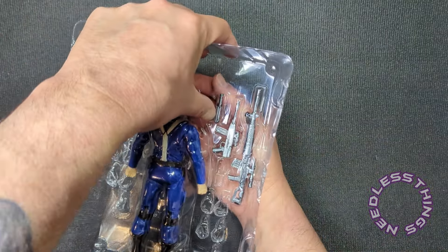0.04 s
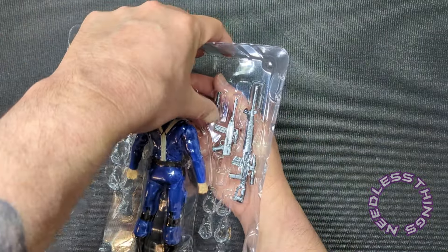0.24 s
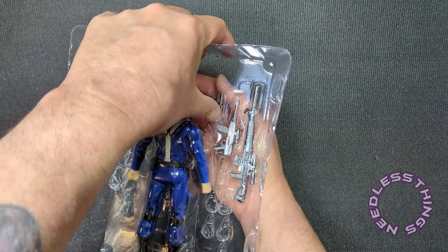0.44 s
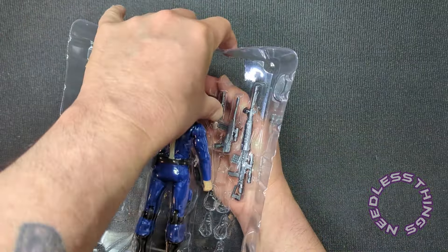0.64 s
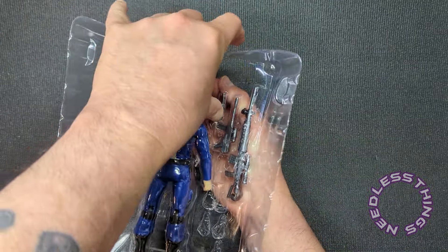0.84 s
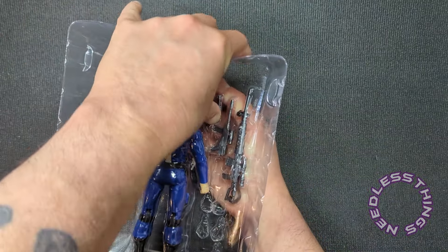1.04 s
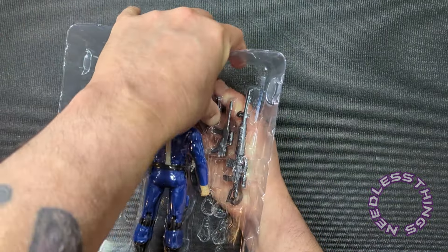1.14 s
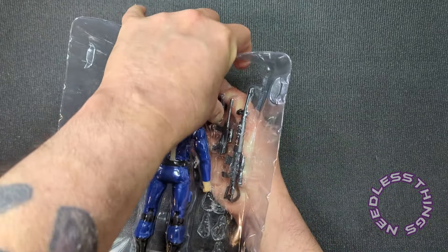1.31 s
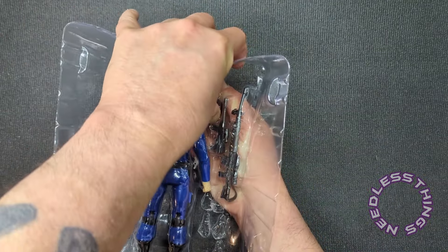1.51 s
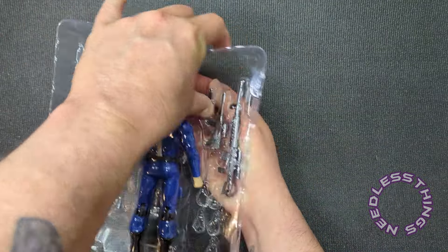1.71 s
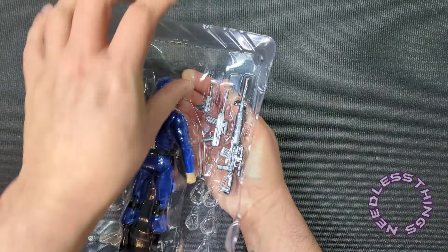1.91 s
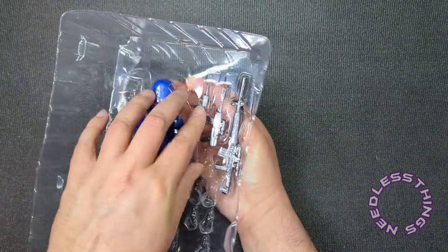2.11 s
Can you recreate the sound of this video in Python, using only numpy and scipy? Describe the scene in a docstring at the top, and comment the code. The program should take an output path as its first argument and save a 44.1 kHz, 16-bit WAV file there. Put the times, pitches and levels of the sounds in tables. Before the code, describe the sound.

A thin plastic tray crackles and snaps irregularly as hands bend it to press out a toy figure. Two louder hollow pops stand out, with soft bumps on a cloth-covered table, close to the microphone in a small room.

```python
"""Pressing an item out of a blister tray

Close to a stereo microphone in a small room, two hands bend a thin plastic tray to free a small item.
Creases snap and set the wall ringing, moulded pockets buckle with hollow pops, and fine crackle runs
between them. A finger judders over the sheet; the tray bumps softly on a cloth-covered table."""
import sys
import numpy as np
from scipy import signal
from scipy.fft import rfft, irfft
from scipy.io import wavfile

SR = 44100
rng = np.random.default_rng(int(sys.argv[2]) if len(sys.argv) > 2 else 0)


def dump_mix(stems):
    """Bounce the given channels to the path in sys.argv[1] as a 16-bit WAV at rate SR."""
    frames = np.atleast_2d(stems).T  # one column per channel
    limited = np.clip(frames, -1, 1)  # hard clip at full scale
    pcm = np.round(limited * 32767).astype(np.int16)
    wavfile.write(sys.argv[1], SR, pcm)


N = 94815
BURST = 8192  # samples in one snap or pop
CUTOFF_HZ = 15900
PAN_DB = np.array([[-1.15], [1.15]])  # cracks and fizz sit a little to the right

# Creases snapping: (time [s], crack level [dB], added tilt [dB/octave], facet pitch [Hz], wall level [dB])
CREASE_SNAPS = [(0.0405, -36, -7, 2140, -41), (0.069, -36.5, -5.5, 7530, -52),
                (0.101, -39, -5.5, 2230, -51), (0.177, -52, -7, 2000, -47.5),
                (0.221, -39.5, -3, 6900, -35.5), (0.2445, -25.5, -8.5, 5300, -33),
                (0.277, -37, 9, 14000, -44), (0.338, -41, 0, 2930, -44.5), (0.363, -35.5, 1.5, 13400, -44),
                (0.4158, -25.5, 3, 12900, -67), (0.458, -28.5, -11.5, 2780, -29.5),
                (0.507, -27.5, 9, 13700, -43), (0.5185, -29, -12, 1800, -26), (0.543, -19, -2, 5100, -27),
                (0.592, -31.5, -7, 2860, -65), (0.6095, -24, -5, 1300, -18), (0.669, -32, -1, 2200, -40),
                (0.6811, -22.5, -2.5, 6500, -41), (0.7086, -23.5, -2.5, 4570, -31.5),
                (0.745, -33, -2.5, 8000, -33), (0.781, -28.5, -2.5, 2280, -39),
                (0.89, -28, 1.5, 2780, -42.5), (0.9325, -30.5, 12, 12200, -38),
                (0.9566, -26.5, -6, 5900, -38), (1.021, -34.5, -4.5, 7500, -57),
                (1.051, -46, 8, 2700, -31.5), (1.0851, -22, -1.5, 9200, -46), (1.111, -37, -6, 2020, -29.5),
                (1.239, -23.5, -2, 8950, -30.5), (1.256, -26.5, 4, 13200, -42),
                (1.2752, -22.5, -2, 8800, -41), (1.292, -23.5, 1.5, 13900, -27),
                (1.2971, -18, 2, 14300, -32), (1.33, -27.5, -2.5, 7160, -28),
                (1.363, -23.5, -2, 6750, -26.5), (1.3825, -23, 0.8, 7050, -30.5),
                (1.397, -23.5, -10, 8900, -25), (1.404, -21, 2.5, 6400, -24.5),
                (1.408, -24.5, -10, 1050, -23), (1.415, -28.5, -0.5, 9000, -44),
                (1.4833, -14.5, -7, 6400, -61), (1.623, -33, -5, 2030, -53), (1.661, -27, -4.5, 14400, -32),
                (1.683, -31.5, 2, 6140, -26), (1.717, -31, -16, 4170, -17),
                (1.7505, -23.5, -4.5, 1560, -27), (1.7905, -42, -8, 2700, -25.5),
                (1.805, -24, -2.5, 12200, -16), (1.86, -31, -4.5, 2450, -46),
                (1.876, -25.5, -9.5, 2530, -24), (2.051, -46, -1.5, 8300, -51)]
# Modes of the tray wall: (frequency [Hz], level [dB], t60 [s])
WALL_MODES = [(649, -6.5, 0.04), (755.6, 3.5, 0.037), (903, -5, 0.03), (1060, -6.5, 0.035),
              (1297, -27, 0.064), (1483, -6.5, 0.028)]


def snaps():
    """Each crease cracks and knocks the tray wall, which the grip retunes from snap to snap."""
    out = np.zeros((2, N))
    for start, crack_db, tilt_db, facet_hz, wall_db in CREASE_SNAPS:
        crack = from_db(crack_db + 0.5 + PAN_DB) * crease_crack(tilt_db + 0.5, facet_hz)
        wall = from_db(wall_db) * ring(WALL_MODES, detune=0.028, build_up_cycles=1.6)
        add(out, start, crack + wall)
    return out


def crease_crack(tilt_db, facet_hz):
    """A hard tick and a short burst of noise, coloured by the facet that flips."""
    rise_s, decay_s, low_hz, facet_width_hz, likeness = 0.00037, 0.002, 1150, 1170, 0.32
    t = np.arange(BURST) / SR
    hz = np.geomspace(100, SR / 2, 400)
    ripple_db = 2.5 * np.interp(hz, np.linspace(0, SR / 2, 48), rng.standard_normal(48))
    slope_db = tilt_db * np.log2(np.clip(hz, low_hz, CUTOFF_HZ) / low_hz)
    edge_loss_db = 10 * np.log10(1 + (low_hz / hz) ** 4) + 20 * (hz > CUTOFF_HZ)
    facet_db = 8.5 / (1 + (2 * (hz - facet_hz) / facet_width_hz) ** 2)
    colour_db = slope_db + ripple_db + facet_db - edge_loss_db
    shimmer = from_db(-9) * np.exp(-t / 0.011)  # bending waves run on through the sheet
    envelope = (1 - np.exp(-t / rise_s)) * (np.exp(-t / decay_s) + shimmer)
    mid, side = envelope * rng.standard_normal((2, BURST))
    mid[int(2 * rise_s * SR)] += from_db(18) / 2  # the tick
    return unit_strike(coloured(left_right(mid, side, likeness), np.c_[hz, colour_db]))


# Pockets buckling or springing back: (time [s], level [dB], sharpness of the push [Hz])
POCKET_POPS = [(0.245, -32.5, 593), (.458, -36, 620), (0.8488, -12.5, 850), (1.074, -38, 426),
               (1.195, -40, 250), (1.4847, -13, 2530), (1.4963, -21.5, 463), (1.7511, -26.5, 594),
               (1.859, -29, 760)]
# Modes of a pocket: (frequency [Hz], level [dB], t60 [s])
POCKET_MODES = [(140, -19, 0.14), (198.7, -13.5, 0.07), (313.3, -8.5, 0.058), (398, -9.5, 0.068),
                (565, 0, 0.044), (774.6, 3, 0.041), (957, 2.5, 0.029), (1257, -5.5, 0.076),
                (1350, 0, 0.039), (1560, -6, 0.061), (1875, 0.5, 0.039)]


def pops():
    """A pocket flips, shoves the air, cracks at its rim and rings; sharper pushes drive higher modes."""
    flip_s, shove_max_hz, shove_cycles = 0.003604, 790, 1.25
    out, t = np.zeros((2, N)), np.arange(BURST) / SR
    hz, mode_db, t60 = np.transpose(POCKET_MODES)
    for start, level_db, sharp_hz in POCKET_POPS:
        cycles = min(sharp_hz, shove_max_hz) * (t - flip_s)
        swell = np.exp(-(cycles / shove_cycles) ** 2) * np.minimum(t / flip_s, 1)
        shove = from_db(3.5) * swell * np.sin(2 * np.pi * cycles)
        rim_band = signal.butter(1, [sharp_hz, 2 * sharp_hz], "band", fs=SR)
        burst = stereo_noise(BURST) * np.exp(-t / (2 * flip_s))
        crack = from_db(-9.5) * unit_strike(signal.lfilter(*rim_band, burst))
        # modes above the push's sharpness, or far below it, are barely driven
        loss_db = 10 * np.log10((1 + (hz / sharp_hz) ** 6) * (1 + (0.15 * sharp_hz / hz) ** 2))
        hollow = ring(np.c_[hz, mode_db - loss_db, t60], detune=0.012, build_up_cycles=2.5)
        add(out, start, from_db(level_db) * (hollow + shove + crack))
    return out


# How strongly the sheet flexes: (time [s], rustle level [dB], fizz level [dB])
FLEXING = [(0, -61.5, -49), (0.06, -37.5, -45), (0.175, -71.5, -72), (0.235, -39.5, -30.5),
           (0.32, -67, -57), (0.41, -44, -40.5), (0.55, -40, -31), (0.66, -48, -37.5), (0.82, -46.5, -48.5),
           (0.92, -43.5, -41.5), (0.97, -37.5, -32.5), (1.04, -52.5, -39.5), (1.09, -44, -36.5),
           (1.15, -55.5, -47.5), (1.185, -37.5, -33), (1.225, -57, -52.5), (1.3, -36.5, -24.5),
           (1.41, -41, -28.5), (1.45, -48.5, -37.5), (1.52, -33, -32.5), (1.6, -54, -48.5),
           (1.69, -35, -31.5), (1.87, -42, -33.5), (1.97, -61.5, -77), (2.15, -74.5, -55)]
# Spectrum of the rubbed wall: (frequency [Hz], level [dB])
RUSTLE_SPECTRUM = [(200, -30.5), (350, -13), (500, -6.5), (750, 1.5), (1150, -4.5), (2300, -6.5),
                   (4000, -18), (16000, -86)]
# Spectrum of the tiny creases: (frequency [Hz], level [dB])
FIZZ_SPECTRUM = [(500, -46), (2000, 10.5), (3200, 11), (7000, 8.5), (11000, 4), (14000, 4.5), (16000, -5)]


def crackle():
    """Rubbing rustles in the wall and tiny creases fizz, as strongly as the sheet is flexed."""
    rustle_db, fizz_db = in_time(FLEXING)
    rubs = grains(per_s=1900, spread_db=5, grain_s=0.0014)
    creases = grains(per_s=560, spread_db=4.8, grain_s=0.0033)
    rustle = from_db(rustle_db + 3) * unit_rms(coloured(rubs, RUSTLE_SPECTRUM))
    fizz = from_db(fizz_db - 5.5 + PAN_DB) * unit_rms(coloured(creases, FIZZ_SPECTRUM))
    return rustle + fizz


def finger_slide():
    """A finger sticks and slips, rubbing the wall into a short, juddering rasp."""
    start_s, end_s, slips_per_s, slip_decay_s = 0.985, 1.021, 260, 0.0021
    t = np.arange(N) / SR
    since_slip = (t - start_s) % (1 / slips_per_s)
    slips = np.exp(-since_slip / slip_decay_s) * (t > start_s) * (t < end_s)
    rub = stereo_noise(N)
    return from_db(-28) * coloured(slips * rub, RUSTLE_SPECTRUM) / np.std(coloured(rub, RUSTLE_SPECTRUM))


# Hands bumping tray and table: (time [s], level [dB])
BUMPS = [(0, -71), (.83, -59.5), (.865, -39), (1.02, -65), (1.2, -49.5), (1.26, -63), (1.47, -57),
         (1.51, -45), (1.63, -60.5), (1.74, -47), (1.93, -52.5), (2.15, -72.5)]
# Spectrum of a bump on the cloth: (frequency [Hz], level [dB])
THUD_SPECTRUM = [(25, -24), (50, 3), (75, 1), (170, 1.5), (1200, -25.5)]


def table_bumps():
    """The hands bump the tray on the covered table: dull swells of low noise."""
    level_db, = in_time(BUMPS)
    return from_db(level_db) * unit_rms(coloured(stereo_noise(N), THUD_SPECTRUM))


# Colour of the small room's reflections: (frequency [Hz], gain [dB])
REFLECTION_COLOUR = [(400, -5.5), (5000, -6), (16000, -8.5)]


def reflections(direct):
    """Table and walls return a short diffuse tail to the microphone."""
    t60_s, delay_s = 0.12, 0.0057
    t = np.arange(2 * BURST) / SR
    tail = stereo_noise(2 * BURST) * np.exp(-np.log(1000) * t / t60_s) * (t > delay_s)
    tail = coloured(tail / np.sqrt(np.sum(tail ** 2) / 2), REFLECTION_COLOUR)
    return from_db(-5) * signal.fftconvolve(direct, tail, axes=1)[:, :N]


# Spectrum of the room's air: (frequency [Hz], level [dB])
AIR_SPECTRUM = [(170, -21.5), (700, 10), (3000, -38.5)]


def room_tone():
    """The still air of the room, a faint steady hiss behind the tray."""
    return from_db(-63.5) * unit_rms(coloured(stereo_noise(N), AIR_SPECTRUM))


# Likeness of the microphone's two sides: (frequency [Hz], correlation [0-1])
MIC_LIKENESS = [(750, 0.93), (1500, 1), (4000, 0.18)]


def stereo_noise(size):
    """White noise, alike on both sides in the bass and less so in the treble."""
    mid, side = rfft(rng.standard_normal((2, size)))
    return irfft(left_right(mid, side, per_bin(MIC_LIKENESS, size)), size)


def left_right(mid, side, likeness):
    """Blend mid and side into two channels with the given correlation."""
    return np.sqrt((1 + likeness) / 2) * mid + np.sqrt((1 - likeness) / 2) * side * [[1], [-1]]


def ring(modes, detune, build_up_cycles, scatter_db=2):
    """Modes swell, the low ones later, and decay, each with a chance strength, phase and tuning."""
    hz, db, t60 = np.transpose(modes)[:, :, None]
    t = np.arange(BURST) / SR
    tuning, strength = rng.standard_normal((2, len(hz), 1))
    phase = rng.random((len(hz), 1))
    envelope = (1 - np.exp(-t * hz / build_up_cycles)) * np.exp(-np.log(1000) * t / t60)
    tones = np.sin(2 * np.pi * (hz * (1 + detune * tuning) * t + phase))
    return unit_strike(np.sum(from_db(db + scatter_db * strength) * envelope * tones, 0))


def grains(per_s, spread_db, grain_s):
    """Random tiny bursts of noise of uneven size."""
    onsets = rng.random(N) < per_s / SR
    sizes = onsets * from_db(spread_db * np.minimum(rng.exponential(1, N), 3.5))
    power = signal.lfilter([1], [1, -np.exp(-2 / (grain_s * SR))], sizes ** 2 + 1e-18)
    return np.sqrt(power) * stereo_noise(N)


def coloured(x, curve):
    """Causal (minimum-phase) filter with the given dB curve."""
    n = x.shape[-1]
    size = 2 ** int(np.ceil(np.log2(n + BURST)))
    cepstrum = irfft(np.log(from_db(per_bin(curve, size))))
    cepstrum[1:size // 2] *= 2
    cepstrum[size // 2 + 1:] = 0
    return irfft(rfft(x, size) * np.exp(rfft(cepstrum)))[..., :n]


def per_bin(curve, size):
    """Read a curve at each FFT bin, on a log-frequency axis."""
    hz, values = np.transpose(curve)
    bin_hz = np.maximum(np.arange(size // 2 + 1) * SR / size, 1)
    return np.interp(np.log(bin_hz), np.log(hz), values)


def in_time(rows):
    """Columns of a curve, sample by sample."""
    times, *columns = np.transpose(rows)
    return [np.interp(np.arange(N) / SR, times, column) for column in columns]


def from_db(db):
    return 10 ** (np.asarray(db) / 20)


def unit_rms(x):
    return x / np.sqrt(np.mean(x ** 2) + 1e-20)


def unit_strike(x):
    """Scale a burst to the energy of 6 ms at rms 1."""
    return x / np.sqrt(np.mean(x ** 2) * BURST / 265 + 1e-20)


def add(out, start_s, burst):
    i = int(start_s * SR)
    out[:, i:i + BURST] += burst[..., :N - i]


def scene():
    """The tray close up in its room; the sound reaches the microphone's right side first."""
    lag_samples = 5
    tray = snaps() + pops() + crackle() + finger_slide()
    left, right = tray + reflections(tray) + table_bumps() + room_tone()
    return np.array([np.pad(left, (lag_samples, 0))[:N], right])


def record(dry):
    """The recorder clips peaks at full scale and cuts the top of the treble."""
    lowpass = signal.ellip(10, 0.1, 75, CUTOFF_HZ, fs=SR, output="sos")
    return signal.sosfilt(lowpass, np.clip(dry, -1, 1))


dry = scene()
out = record(dry)
dump_mix(out)
```